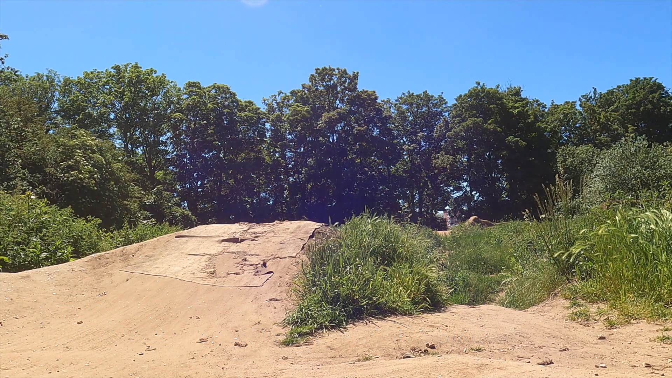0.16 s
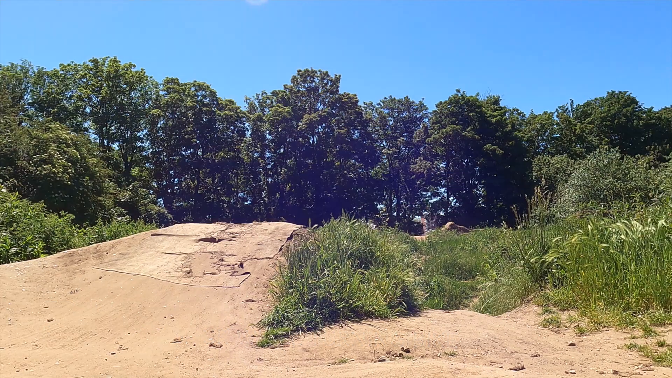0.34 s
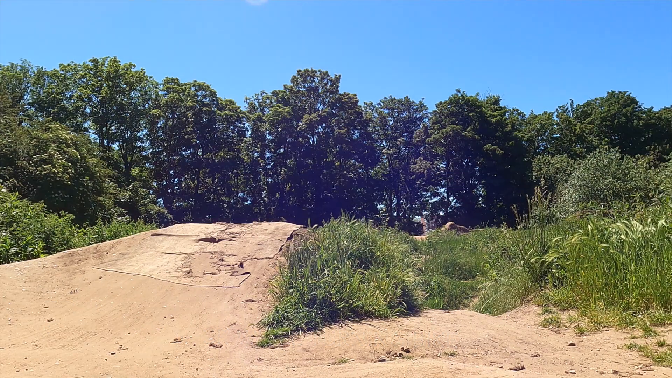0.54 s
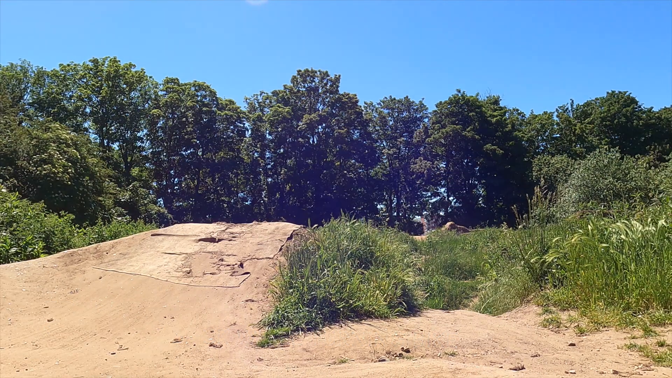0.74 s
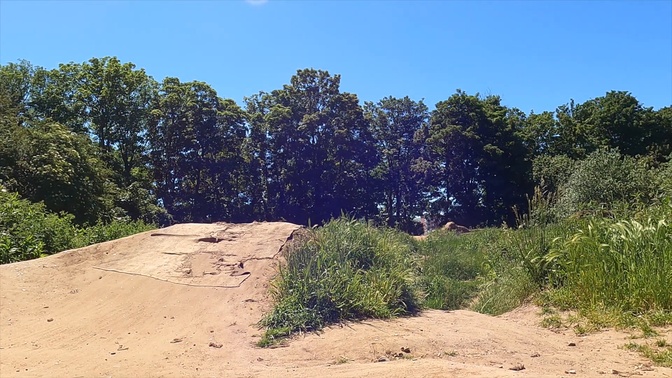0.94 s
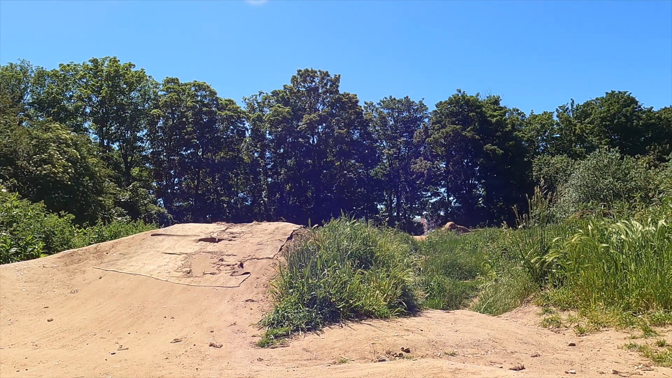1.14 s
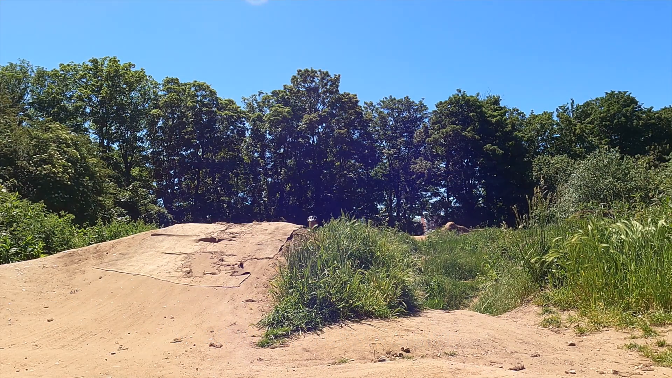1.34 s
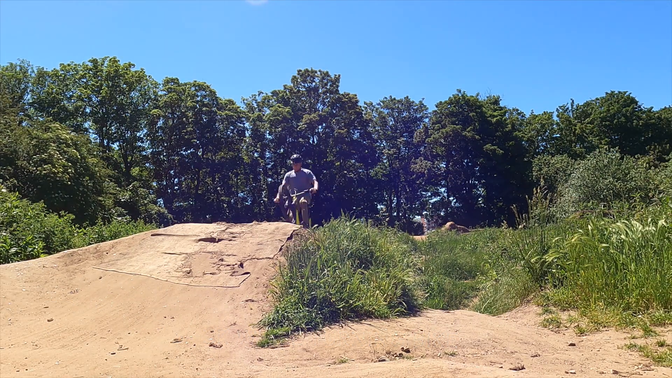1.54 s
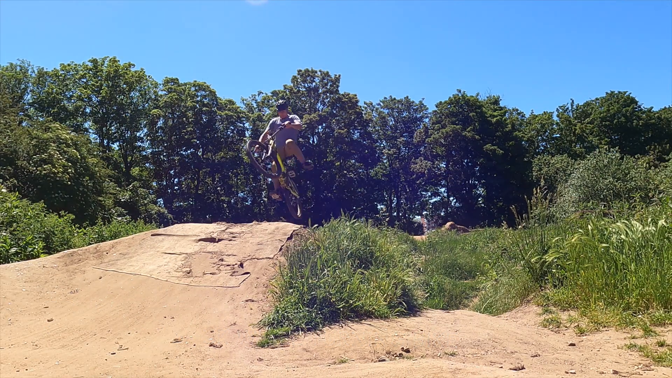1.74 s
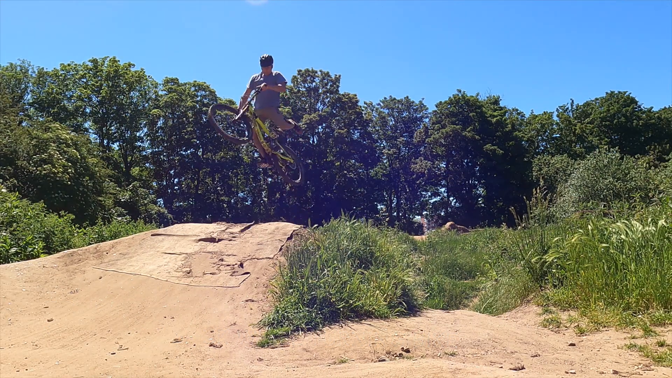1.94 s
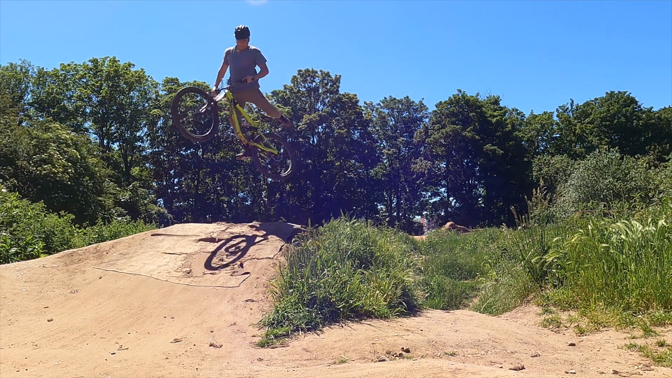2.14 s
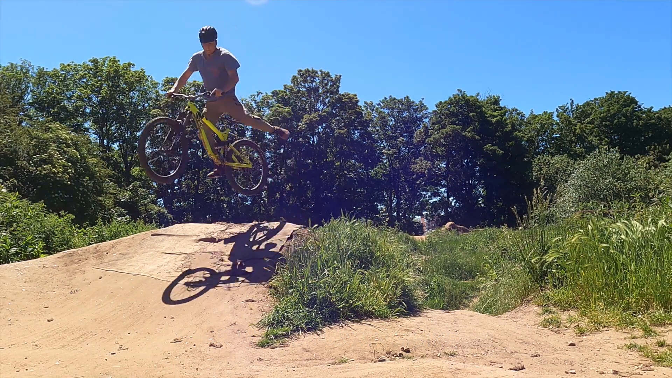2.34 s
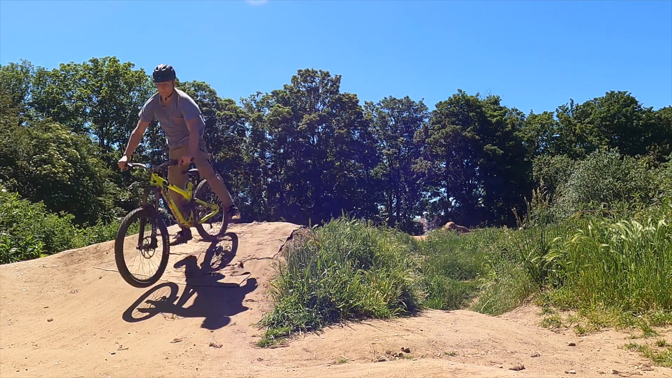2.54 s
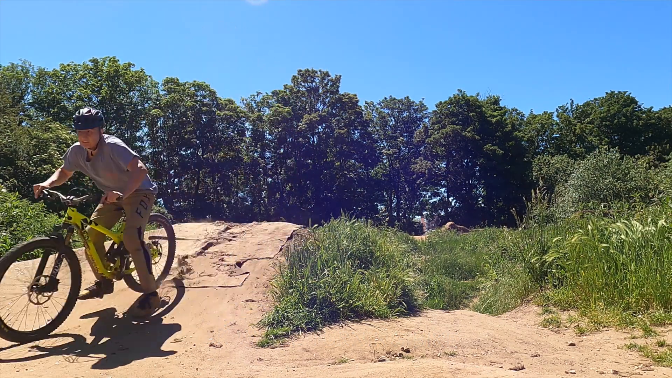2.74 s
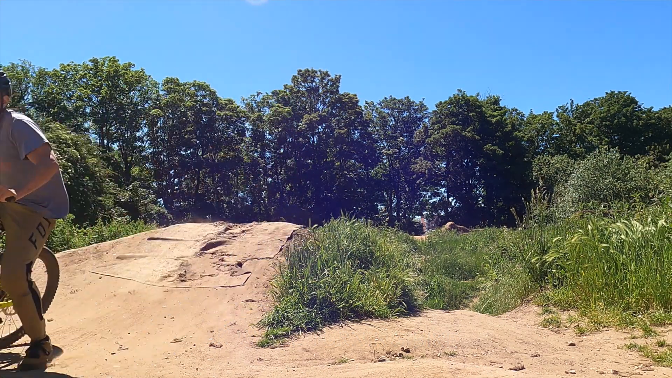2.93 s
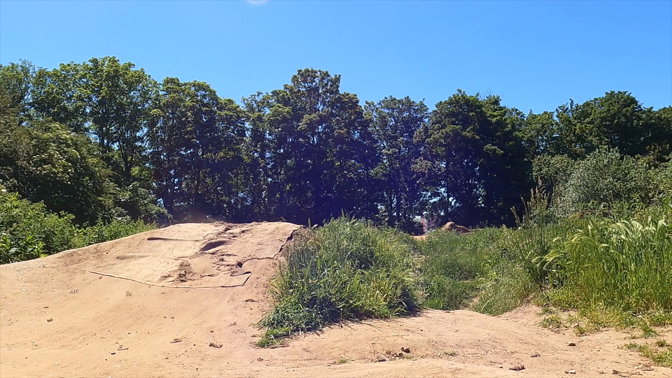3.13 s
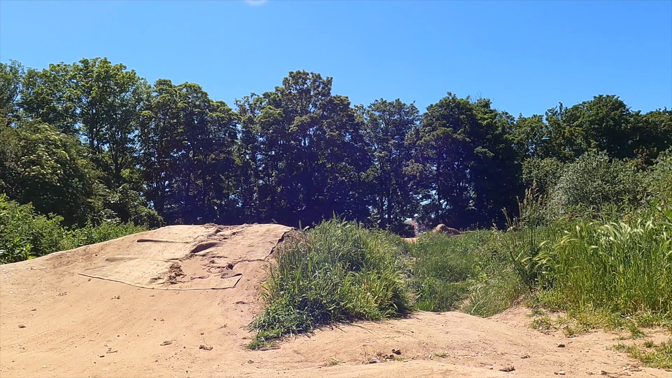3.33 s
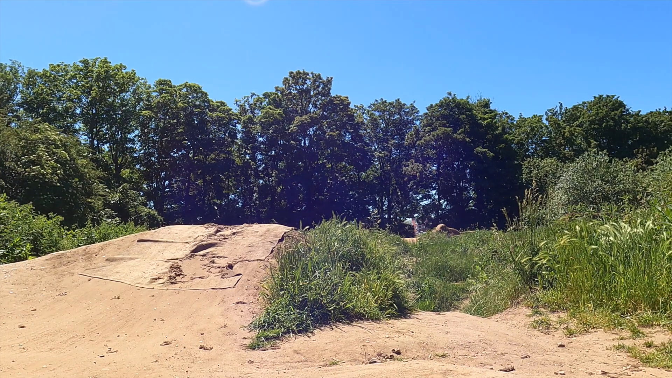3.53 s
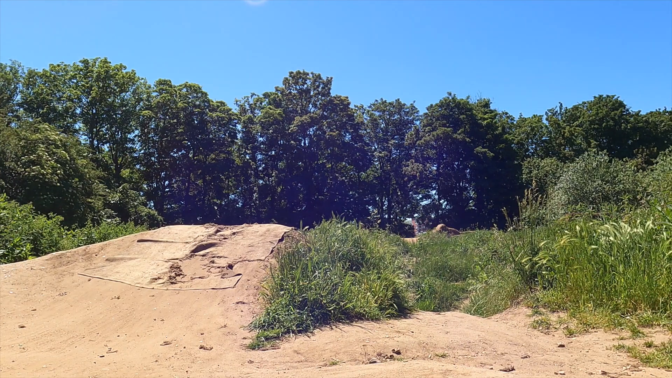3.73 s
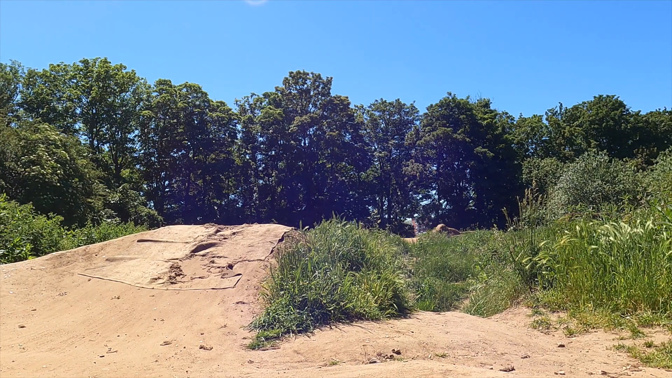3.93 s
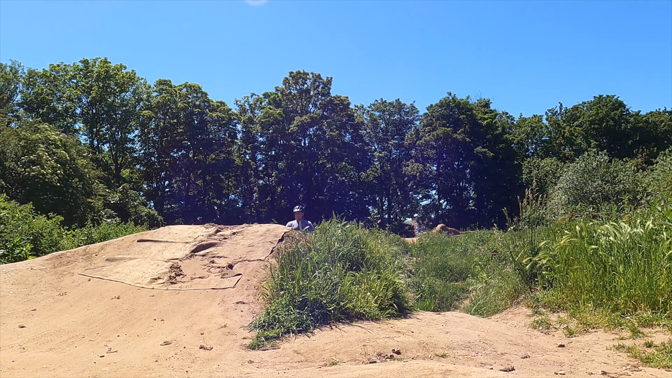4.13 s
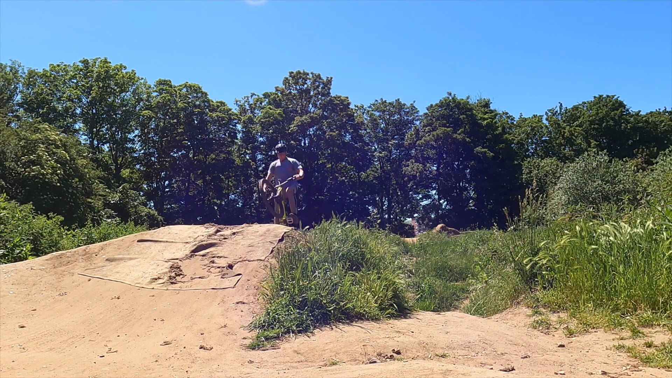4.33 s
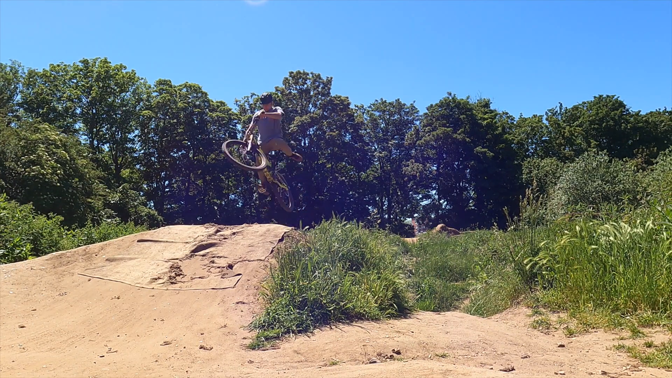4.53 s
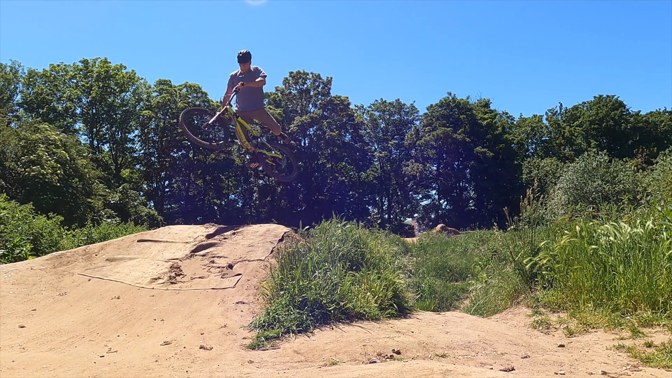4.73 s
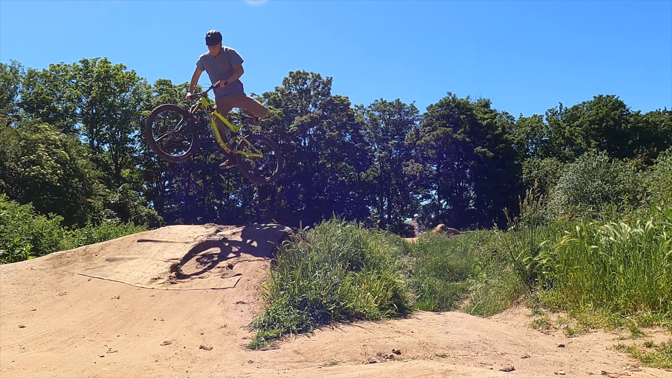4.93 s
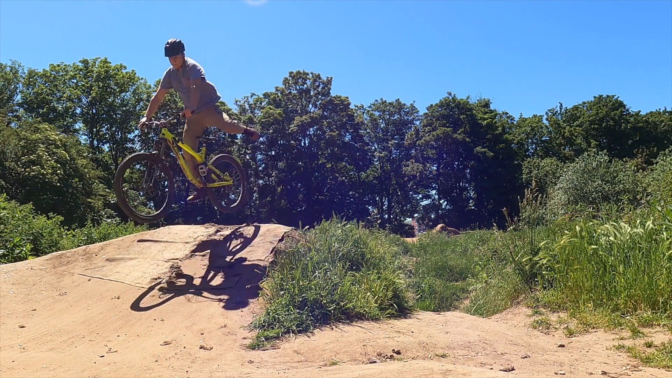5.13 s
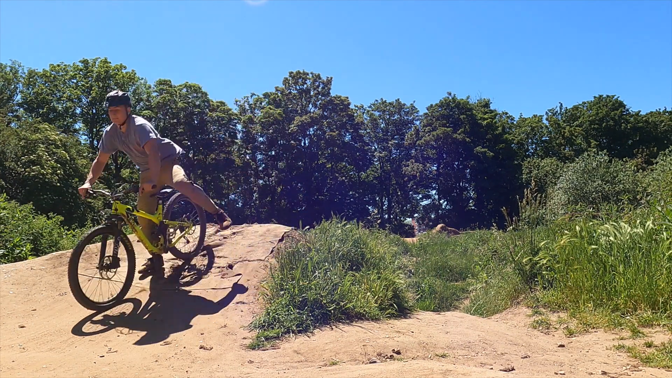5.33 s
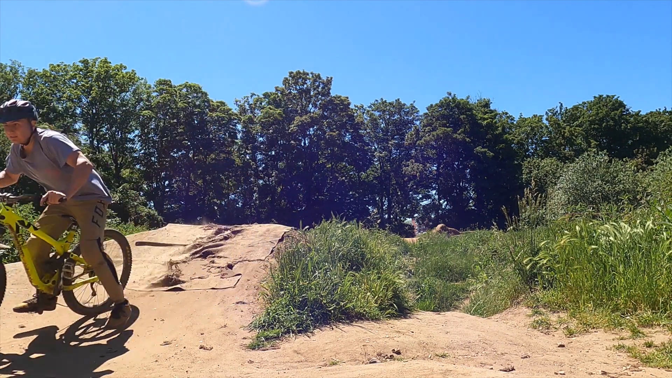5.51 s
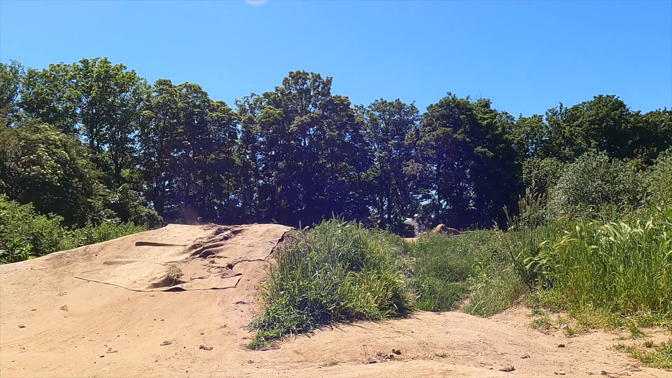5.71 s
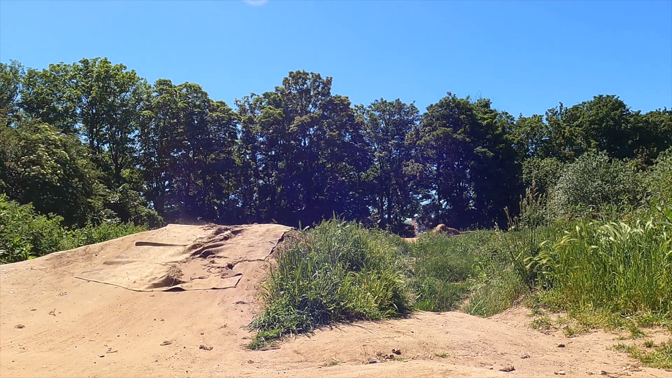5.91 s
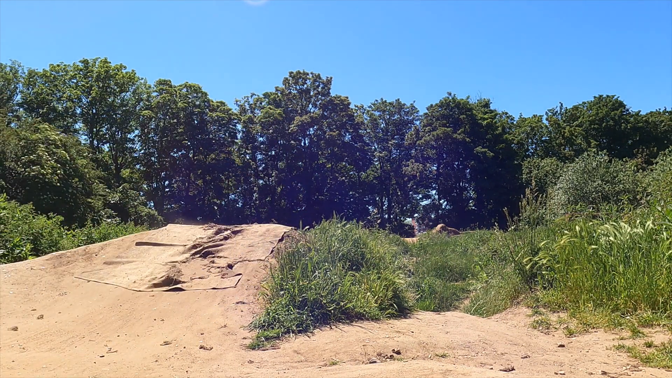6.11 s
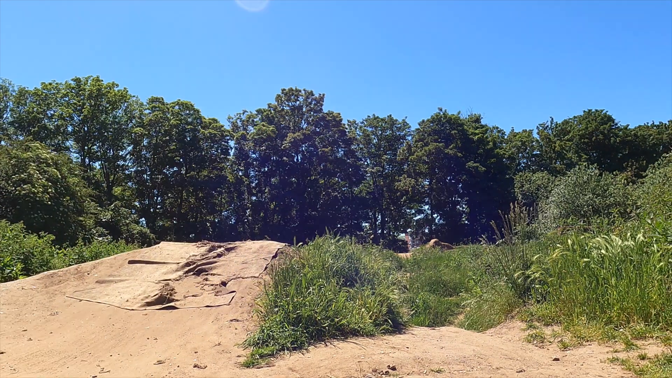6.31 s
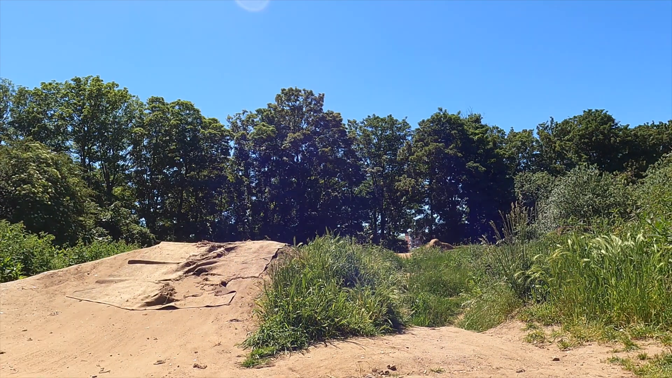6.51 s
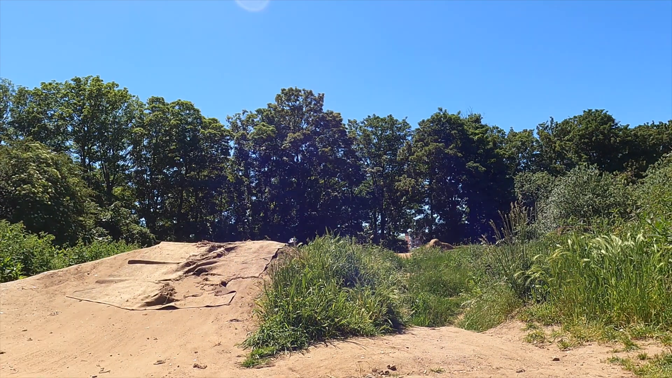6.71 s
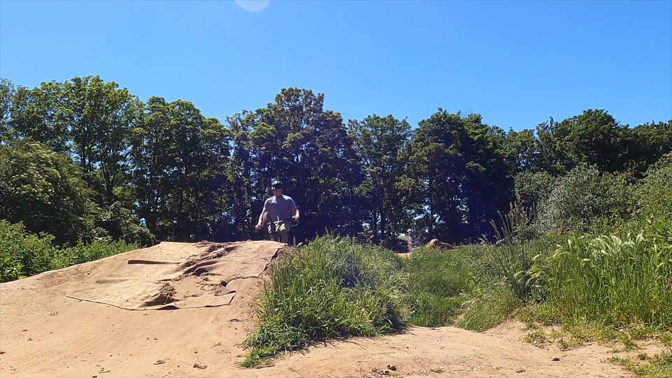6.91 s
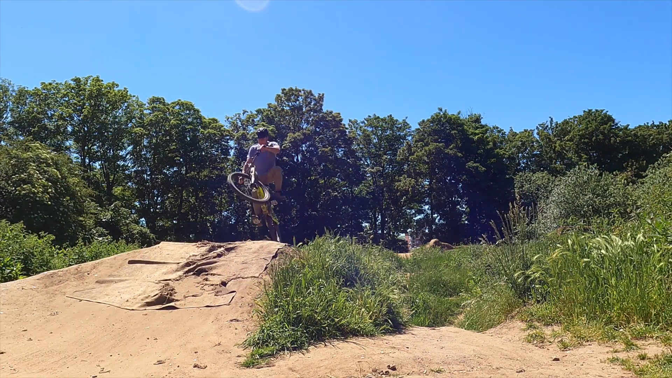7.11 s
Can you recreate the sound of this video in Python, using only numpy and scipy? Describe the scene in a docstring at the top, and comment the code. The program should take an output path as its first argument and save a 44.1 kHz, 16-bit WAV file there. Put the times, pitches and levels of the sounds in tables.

```python
"""A mountain bike sets off close by with quickening freehub ticks, over light wind and leaves that run throughout.
Then come three dirt jumps, joined by abrupt cuts and each on its own clock: tread noise drones up a far ramp,
the wheels squeak off the lip, and the freehub buzzes in flight as pawl clicks ringing a hub, over a faint swish.
In the first two, sine thumps and noise slaps land the wheels; grit, skids, stones and chain rattle past to the left.
The third ends in mid-air."""
import sys
import numpy as np
from scipy import signal
from scipy.fft import rfft, irfft, next_fast_len
from scipy.io import wavfile
from scipy.ndimage import uniform_filter1d, map_coordinates

SR = 44100
rng = np.random.default_rng(int(sys.argv[2]) if len(sys.argv) > 2 else 0)


def wav_record(signal):
    """Record a signal, one row per channel, as 16-bit PCM in the file named by sys.argv[1]."""
    frames = np.transpose(np.atleast_2d(signal))
    bounded = np.clip(frames, -1, 1)
    # unit amplitude maps onto the largest positive 16-bit level
    quanta = np.round(bounded * 32767).astype(np.int16)
    wavfile.write(sys.argv[1], SR, quanta)


N = 315756

# All levels are relative: each layer's spectrum and mix trims are applied on top.
# The jumps: cut_in_s, take_off_s, crunch_db
JUMPS = [(0.279, 1.584, -1), (3.265, 4.311, .5), (6.252, 6.999, 1)]
# Wind buffets on the microphone: start_s, length_s, level_db
GUSTS = [(0, 0.084, -24), (.148, .025, -21), (.2, .068, -25)]
# Low wind rumble, its softer midrange air, and far leaves: pitch_hz, level_db
RUMBLE_SPECTRUM = [(12, -48), (20, -8), (35, -0.5), (53, 4.5), (75, -2), (103, -3), (129, -7), (206, -18.5),
                   (243, -27.5), (280, -12.5), (360, -38), (620, -120)]
AIR_SPECTRUM = [(80, 0), (200, 2), (400, -2), (800, -9), (1500, -30.5), (4000, -61)]
LEAVES_SPECTRUM = [(470, -22.5), (800, -19), (1010, -1), (1170, 0), (1290, -8.5), (1550, -7.5), (1860, -9),
                   (2440, -4.5), (3840, -18.5), (4790, -16.5), (5550, -21.5), (7360, -23.5), (8430, -18),
                   (13900, -39.5), (15000, -61)]
# Single freehub ticks heard close by: pitch_hz, level_db
TICK_SPECTRUM = [(600, -34), (1500, -8), (2500, 4), (3400, -8), (4600, -3), (6000, -5), (8400, 0),
                 (10000, -11), (12500, -20), (15500, -42)]
# Decay of the answer from banks and trees: pitch_hz, t60_s
TREES_DECAY = [(200, 0.29), (2000, 0.57), (10000, .1)]
# Tyre load from touchdown until they have gone by: after_take_off_s, body_db, grit_db
ROLL = [(.995, -35.5, -36), (1.07, -33, -31.5), (1.15, -30.5, -35), (1.21, -36, -35), (1.36, -33.5, -32),
        (1.53, -33.5, -32.5), (1.68, -36.5, -36), (1.95, -41, -41)]
# Short scrapes of the tyres through loose grit: start_s, length_s, level_db
CRUNCHES = [(.14, 0.13, -48), (2.985, 0.082, -34), (5.5, .06, -34), (5.69, .04, -34), (6.03, 0.019, -28),
            (6.075, 0.099, -34)]
# Crushed grit and the boom of the tyre body: pitch_hz, level_db
GRIT_SPECTRUM = [(410, -18.5), (700, 5), (850, -29), (1050, -4), (1450, -3), (2400, 0.5), (2800, 0),
                 (3150, -6.5), (6420, -6.5), (7500, -7), (8880, -6.5), (10600, -17), (12400, -15),
                 (15500, -48)]
TYRE_SPECTRUM = [(53, -34), (90, -2), (130, 2.5), (234, -5.5), (296, 4), (360, -2), (661, -7),
                 (1200, -10.5), (1560, -40.5), (2640, -120)]
# Stones and chain striking the bike: start_s, peak_db, ring_hz, knock_db, contact_s
CLACKS = [(.1475, -33, 2950, 4, .003), (.1825, -35, 3000, 4, .003), (.2368, -11, 3490, -4, 0.0033),
          (.244, -27, 2150, -4, .004), (.3775, -25, 2630, 0.5, 0.0064), (.483, -42, 7000, -8, 0.0071),
          (.5445, -33.5, 2270, 8, .003), (.624, -34, 2750, -4, .002), (.6388, -27, 2580, -7, 0.0054),
          (.806, -45, 2600, 7, 0.0017), (1.372, -42, 2300, 2, 0.012), (1.4215, -38.5, 2600, 5, 0.0082),
          (1.535, -42, 3800, -4, .02), (1.5856, -31, 1950, 3, .006), (1.77, -34, 2200, 7.5, 0.0055),
          (2.6017, -16, 2630, 5, 0.0067), (2.632, -14, 3470, 7, 0.0023), (2.6471, -8, 4900, -3, 0.0077),
          (2.6667, -4.5, 7120, -23, .003), (2.6864, -17, 5440, -11, .003), (2.696, -24, 7560, -12, .002),
          (2.718, -14.5, 6000, -10, .002), (2.7555, -16.5, 6840, -15, 0.0018),
          (2.799, -16.5, 6070, -15, .002), (2.811, -11, 6070, -18, 0.0037),
          (2.8619, -13, 6230, -21, 0.0018), (2.8948, -14, 6600, -15, .001), (2.914, -15.5, 4260, -20, .003),
          (3.0215, -10, 4130, -8, 0.0044), (3.0326, -11.5, 4400, -2.5, .004), (3.0589, -25, 1760, -2, .003),
          (3.0774, -19, 2440, 4, .003), (3.0944, -10, 4230, -15, 0.0074), (3.1054, -25, 4006, 4, 0.0026),
          (3.2136, -8, 5660, -28.5, .003), (3.306, -34, 2600, 6, 0.0017), (4.172, -45, 3330, -5, .01),
          (4.288, -42, 3770, -4, 0.025), (4.3314, -35.5, 3670, 2, .005), (4.405, -39, 2040, 8.5, 0.016),
          (4.8399, -21, 5480, -7, 0.0025), (4.888, -21.5, 5500, -8, .002), (5.222, -27.5, 2000, 2, 0.0046),
          (5.321, -17, 4450, -18, 0.0081), (5.353, -16, 3500, 3, 0.0011), (5.369, -3, 4230, -13, 0.0015),
          (5.374, -11, 5070, -12, .002), (5.3785, -7, 7200, -18, 0.0016), (5.4047, -9.5, 4540, -13, 0.0026),
          (5.411, -13, 6010, -10, 0.0049), (5.4284, -11, 4270, -3, 0.0021), (5.4515, -10, 5910, -3, 0.0009),
          (5.4834, -16.5, 5000, -2, .003), (5.494, -14.5, 4280, -10, .004), (5.5054, -16, 6500, -8, .002),
          (5.5787, -13.5, 6750, -8, 0.0039), (5.6895, -15, 7880, -13, .002),
          (5.7224, -18, 2050, -4, 0.0025), (5.7584, -15, 5500, -5, .002), (5.8047, -21, 6000, 2, 0.0043),
          (5.8272, -12, 4980, -6, 0.00097), (5.8444, -14.5, 6030, -12, 0.0021), (5.897, -12, 4290, 6, .002),
          (5.9295, -10, 4280, 3, 0.0071), (5.97, -15.5, 6000, 1, 0.0027),
          (6.0157, -22.5, 7400, -12, 0.0012), (6.032, -15, 2074, 4, 0.0065),
          (6.2379, -25, 4130, 11.5, 0.0045), (6.845, -45, 3350, 4, .008), (6.966, -45, 3780, 11, .004),
          (7.0113, -36, 3770, 5, .005)]
# Crack, its treble sparkle, and the duller knock: pitch_hz, level_db
CLACK_SPECTRUM = [(200, -42), (1300, -6), (2200, 4), (3300, 3.5), (4500, 7), (6000, -2.5), (7500, -16),
                  (12000, -33), (15500, -55.5)]
SPARKLE_SPECTRUM = [(3000, -32), (5500, -4), (7300, -3.5), (8500, -8.5), (10000, -13), (12000, -26),
                    (15500, -31)]
KNOCK_SPECTRUM = [(150, 2), (600, 4), (1100, 8.5), (2000, 3), (4000, -45)]
# Tyres pressed into the far dip and the ramp: after_take_off_s, drone_db, loose_grit_db
RUN_UP = [(-1.29, -79, -61.5), (-1.073, -42.5, -53), (-0.977, -34.5, -54), (-0.75, -35.5, -60),
          (-0.8, -42.5, -62), (-.35, -40, -68), (-0.081, -33.5, -61), (-0.013, -45, -54.5),
          (.12, -55, -54.5), (.4, -72, -57)]
# Resonances of the hollow ramp deck: pitch_hz, width_hz, level_db
DECK_MODES = [(295, 18.8, -3), (468, 63, -10), (676, 41, -22.5)]
# Ramp roar, far loose grit, and the growl in the dip: pitch_hz, level_db
RAMP_SPECTRUM = [(120, -30), (200, -16), (237, -25.5), (270, -3.5), (296, 2), (357, -16.5), (506, -5),
                 (700, -16.5), (986, -35.5), (1170, -52), (1400, -35), (1820, -73), (3080, -120)]
FAR_GRIT_SPECTRUM = [(500, -19), (1200, 1), (1800, -1), (2500, 5), (3400, -10), (4500, -11), (8500, -11.5),
                     (11000, -22.5), (15000, -37)]
BITE_SPECTRUM = [(350, -16), (600, 3.5), (900, -2.5), (1200, 0.5), (1700, -40), (3000, -48)]
# Wheels knocking over joints in the ramp: start_s, peak_db
BUMPS = [(0.447, -35), (0.548, -28.5), (1.536, -29), (4.294, -30), (6.965, -28)]
# Squeaks at the lip: start_s, length_s, level_db, first_hz, last_hz
SQUEAKS = [(1.584, .04, -52.5, 7200, 7450), (4.325, .035, -51.5, 7000, 7300),
           (7.005, .035, -52, 7170, 7500)]
# Broad colour of the hub: pitch_hz, level_db
HUB_SPECTRUM = [(470, -58), (800, -31.5), (894, -32.5), (1100, -18.5), (1600, -0.5), (1840, -10),
                (2380, -9.5), (2870, -5.5), (3330, -7.5), (3960, -9.5), (4770, -9), (8340, -0.5),
                (9320, -6.5), (12200, -13.5), (15500, -25)]
# Resonances of hub shell, pawls, and those standing out near touchdown: pitch_hz, width_hz, level_db
SHELL_MODES = [(2412, 62, -0.5), (2794, 52, 5), (3930, 160, -11), (5000, 140, -14.5), (8620, 73, 4),
               (9290, 190, -2)]
PAWL_MODES = [(2340, 380, 4), (4780, 258, -2)]
SING_MODES = [(2380, 76, -5), (2850, 60, -3), (8580, 120, -1.5)]
# Wheels and shoes hitting the ground: start_s, thump_db, tyre_hz, slap_db
LANDINGS = [(2.582, -18, 54.4, -17.5), (2.632, -23, 66.6, -9.5), (2.644, -12, 71, -25),
            (2.734, -33, 110, -15.5), (5.3, -29, 50, -25), (5.353, -17, 75.4, -8.5),
            (5.366, -18, 74.5, -14.5), (5.459, -36, 109.9, -10.5)]
# Slap of a landing: pitch_hz, level_db
SLAP_SPECTRUM = [(60, -12), (250, 0.5), (550, -1.5), (1000, -2.5), (2000, -13), (3500, -14), (6000, -30),
                 (15000, -53.5)]
# Slides on the dirt: start_s, length_s, level_db, first_rasp_hz, last_rasp_hz, broad_scuff_db
SKIDS = [(2.695, 0.044, -35, 1206, 1102, -4), (2.953, 0.014, -23, 1138, 1104, -3.5),
         (2.97, 0.061, -27, 1195, 1600, -1), (3.04, 0.064, -30.5, 1251, 1315, -0.5),
         (5.431, .014, -23, 946, 850, -5), (5.452, .02, -32.5, 845, 855, 2),
         (5.6, 0.0298, -39, 1491, 1299, 4.5), (5.742, 0.043, -23, 957, 1167, -2),
         (5.79, 0.018, -26.5, 1150, 1294, -1), (6.122, 0.0664, -34, 2450, 2250, -12)]
# Broad scuff of rubber on dirt: pitch_hz, level_db
SCUFF_SPECTRUM = [(120, -14), (200, -7.5), (425, -3.5), (628, 4.5), (812, -9), (980, 5), (1270, -5.5),
                  (2380, -6.5), (2730, -35.5), (4250, -13), (5000, -10), (6500, -42), (11000, -120)]
# Tread hum and low throb going by: start_s, length_s, level_db, first_hz, last_hz
HUMS = [(2.717, 0.089, -31, 313, 299), (5.741, 0.18, -33, 212, 167.4), (5.964, 0.34, -28.5, 49, 72.8)]
# Shading of the far side of the microphone: pitch_hz, share_of_pan (ratio)
SHADOW = [(700, 1.2), (1300, 0.78), (2400, 1.36), (4400, 0.85), (9000, 0.98), (13000, 1)]
# Left-right phase difference by pitch: pitch_hz, half_phase_difference_rad
SIDE_PHASE = [(600, 0.061), (1200, 0.17), (2200, 0.13), (4000, 0), (9000, 0), (12000, 0.4)]

# Opening: pawl ticks a second (Hz) from slow to fast, and the time constant of the speed-up
SETTING_OFF_DB, FIRST_TICK_S, SLOW_HZ, FAST_HZ, SPEED_UP_S = -49, 0.0038, 48.4, 106.3, .15
# Steady rumble, plus the draught of the passing bike
WIND_DB, DRAUGHT_DB, DRAUGHT_S, DRAUGHT_WIDTH_S = -39, 4, 1.37, 0.56
# Cracks die in this t60; smaller stones ring higher and sparkle more
CLACK_T60_S, SPARKLE_DB, SPARKLE_DB_PER_OCTAVE, SPARKLE_HZ = .017, -2.5, 6.5, 4000
# Lesser stones thrown up while rolling; pitch is the middle of their range
STRAY_PER_S, STRAY_OVER_GRIT_DB, STRAY_HZ, STRAY_KNOCK_DB, STRAY_S = 24, 8.5, 5630, -14, .0008
# The tread growls higher while pressed into the bottom of the dip
BITE_DB, BITE_S, BITE_WIDTH_S = -51, -0.908, .11
# Hub and pawl ring before facing changes, and their rise and fall around the loudest moment
HUB_DB, PAWL_DB, NEARING_DB_PER_S, LOUDEST_S = -40, -41.2, 7.5, 0.98
# A short extra burst of pawl ring just after take-off
BURST_DB, BURST_S, BURST_WIDTH_S = -47.5, 0.19, 0.067
# The hub rises clear of the lip
CLEAR_S, CLEAR_WIDTH_S = 0.16, 0.042
# The rear wheel swings edge-on and hides the hub, then a shallower dip as it swings back
TURN_S, TURN_WIDTH_S, HUB_TURN_DB, PAWL_TURN_DB = 0.43, 0.1, -12, -15
STRAIGHTEN_S, STRAIGHTEN_WIDTH_S, STRAIGHTEN_DB = 0.778, .1, -2.5
# Some resonances stand out before touchdown; the buzz turns duller once the wheels are down
SING_DB, SING_S, SING_WIDTH_S = -47, 1, 0.091
LANDED_S, HUB_LANDED_DB, PAWL_LANDED_DB = 1.01, -6, 1
# Clicks a second at take-off, time constant of their slowing, rate at which they merge
RATCHET_HZ, SPIN_DOWN_S, BLUR_HZ = 218.8, 2.3, 240
# Ground reflection: lag at take-off, seconds of lag per second, strength before its own tone, end
LAG_S, LAG_GROWTH, REFLECTION, REFLECTION_END_S = 0.000418, 0.00026, 0.46, 0.47
# The bike's own parts reflect the buzz: mean lag, share it wanders, knots a second, strength
GLINT_LAG_S, GLINT_SWING, GLINT_RATE, GLINT = .0008, .14, 9, .18
# Air in the wheels around the top of the jump
SWISH_DB, SWISH_S, SWISH_WIDTH_S = -51, 0.49, 0.3
# Its lowest pitch, its extra height before and after, its width, the wider hiss around it
SWISH_HZ, SWISH_BEND_HZ, SWISH_BAND_HZ, SWISH_BROAD_DB = 1080, 549, 270, -2.5
# The bike goes behind the microphone this long after take-off
PASS_S, PASS_WIDTH_S = 1.68, 0.12
# Left minus right before shading: in flight, added after touchdown, added behind
PAN_AHEAD_DB, PAN_NEAR_DB, PAN_BEHIND_DB = 0, 2.5, 8
TOP_HZ = 15400  # nothing sounds above this


def amp(db):
    """Decibels to gain."""
    return 10 ** (np.asarray(db) / 20)


def unit(x):
    """Scale to rms 1."""
    return x / np.sqrt(np.mean(x ** 2) + 1e-20)


def along(points, hz):
    """Read (Hz, value) points on a log frequency axis."""
    f, v = np.transpose(points)
    return np.interp(np.log(hz + 1), np.log(f + 1), v)


def wobble(rate):
    """A smooth random curve, rate knots a second."""
    knots = rng.standard_normal(int(N * rate / SR) + 4)
    return map_coordinates(knots, [np.arange(N) * rate / SR])


def filtered(x, response):
    """Multiply the spectrum of x by a response of frequency."""
    n = x.shape[-1]
    m = 2 * next_fast_len(n // 2 + 4096)
    return irfft(rfft(x, m) * response(np.fft.rfftfreq(m, 1 / SR)), m)[..., :n]


def coloured(x, spectrum):
    """Shape x with a causal filter of this spectrum, at rms 1."""
    def response(hz):
        # folding the cepstrum gives minimum phase, so attacks stay sharp
        cepstrum = irfft(np.log(amp(along(spectrum, hz)) + 1e-6))
        half = len(cepstrum) // 2
        return np.exp(rfft(np.r_[cepstrum[0], 2 * cepstrum[1:half], np.zeros(half)]))
    return unit(filtered(x, response))


def resonant(x, modes):
    """Ring x through parallel resonances of alternating sign, at rms 1."""
    def response(f):
        total = 0
        for k, (centre, width, db) in enumerate(modes):
            band = 1j * f * width / (centre * centre - f * f + 1j * f * width)
            total = total + (-1) ** k * amp(db) * band
        return total
    return unit(filtered(x, response))


def noise():
    """Fresh white noise."""
    return rng.standard_normal(N)


def grains(rate, spread_db, smooth):
    """Random tiny fractures of uneven size, over a bed of finer ones."""
    sizes = amp(spread_db * np.clip(noise(), -2, 2)) * np.sign(noise())
    fractures = unit(sizes * (rng.random(N) < rate / SR))
    return unit(fractures + smooth * noise())


def patchy(x, depth_db):
    """Vary the colour of x at random over time and pitch, at rms 1."""
    z = signal.stft(x, nperseg=1024)[2]
    across_pitch = uniform_filter1d(rng.standard_normal(z.shape), size=5, axis=0)
    field = uniform_filter1d(across_pitch, size=6, axis=1)
    return unit(signal.istft(z * amp(depth_db * unit(field)), nperseg=1024)[1][:N])


def whistle(hz, width_hz):
    """A narrow band of noise at rms 1 whose centre follows hz."""
    flutter = filtered(rng.standard_normal((2, N)), lambda f: 1 / (1 + (2 * f / width_hz) ** 2))
    phase = 2 * np.pi * np.cumsum(hz) / SR
    return unit(flutter[0] * np.cos(phase) + flutter[1] * np.sin(phase))


def delayed(x, lag_s):
    """Hear x a varying time later."""
    return map_coordinates(x, [np.arange(N) - lag_s * SR], order=3)


def add(track, s, sound):
    """Mix a sound in at time s."""
    part = track[round(s * SR):][:len(sound)]
    part += sound[:len(part)]


def swells(rows, attack, release_t60):
    """Gain of (start_s, length_s, level_db) events: attack, hold, release; the strongest wins."""
    t = np.arange(N) / SR
    gains = []
    for s, length, db in rows:
        release_db = -60 * np.maximum(t - s - length, 0) / release_t60
        gains.append(np.clip((t - s) / attack, 0, 1) * amp(db + release_db))
    return np.max(gains, axis=0)


def per_jump(column):
    """One column of JUMPS, held until the next cut."""
    jumps = np.array(JUMPS)
    return jumps[np.searchsorted(jumps[1:, 0], np.arange(N) / SR), column]


def jump_clock():
    """Seconds since take-off in the current jump, per sample; negative on the approach."""
    return np.arange(N) / SR - per_jump(column=1)


def over_jump(rows, column):
    """Gain from a dB column on the jump clock, silent outside the table's span."""
    rows = np.array(rows)
    db = np.interp(jump_clock(), rows[:, 0], rows[:, column], left=-np.inf, right=-np.inf)
    return uniform_filter1d(amp(db), size=500)


def after(s, width):
    """A soft step from 0 to 1, s seconds after each take-off."""
    return uniform_filter1d((1 + np.tanh((jump_clock() - s) / (2 * width))) / 2, size=500)


def around(s, width):
    """A bell that reaches 1, s seconds after each take-off."""
    return np.exp(-((jump_clock() - s) / width) ** 2)


def breeze(apart=0.023):
    """Wind rumbles and buffets at the microphone and stirs far leaves, partly different on each side."""
    def wide(spectrum, side):
        return coloured(noise(), spectrum) + side * np.array([[1], [-1]]) * coloured(noise(), spectrum)
    rumble_db = WIND_DB + DRAUGHT_DB * around(DRAUGHT_S, DRAUGHT_WIDTH_S) + 0.68 * wobble(4.9)
    rumble = amp(rumble_db) * wide(RUMBLE_SPECTRUM, apart)
    buffet_spectrum = [(15, -9.5), (35, 1.5), (60, -6.5), (150, -21.0), (400, -57), (1500, -54.5)]
    buffets = swells(GUSTS, attack=.01, release_t60=0.086) * wide(buffet_spectrum, side=0.83)
    leaves = amp(-58.0 + 1.77 * wobble(3.04)) * wide(LEAVES_SPECTRUM, side=0.37)
    return rumble + buffets + leaves + amp(-49) * wide(AIR_SPECTRUM, side=0.25)


def setting_off(tick_t60=.03):
    """Close by, the pawls tick one by one, faster as the bike gathers speed, until the first cut."""
    t = np.arange(N) / SR
    rate = FAST_HZ + (SLOW_HZ - FAST_HZ) * np.exp(-t / SPEED_UP_S)
    teeth = np.ceil(np.cumsum(rate * (t > FIRST_TICK_S)) / SR)
    ticks = np.diff(teeth, prepend=0) * amp(noise()) / np.sqrt(rate)
    clicks = signal.fftconvolve(ticks, amp(-60 * t[:SR // 20] / tick_t60))[:N]
    return amp(SETTING_OFF_DB) * coloured(clicks * noise(), TICK_SPECTRUM) * (t < JUMPS[0][0])


def surroundings(x):
    """Banks and trees scatter a thin decaying answer, different in each ear, which stops just after each cut."""
    hz, t, z = signal.stft(rng.standard_normal((2, SR // 3)), SR, nperseg=256)
    decay = amp(-60 * t / along(TREES_DECAY, hz)[:, None])
    tail = signal.istft(z * decay, SR, nperseg=256)[1]
    tail = tail / np.linalg.norm(tail[0])
    parts = np.split(x, [round((cut + .01) * SR) for cut, *_ in JUMPS])
    return np.hstack([signal.fftconvolve(part[None], tail, axes=1)[:, :len(part)] for part in parts])


def rolling():
    """Tyres boom on the packed dirt and crush its grit; single pebbles snap above the finer crunch."""
    clumps = amp(1.4 * wobble(45) + 1.2 * wobble(260))
    sand = grains(rate=3500, spread_db=2.7, smooth=.6)
    grit = coloured(patchy(clumps * sand, depth_db=3.0), GRIT_SPECTRUM)
    body = coloured(clumps * grains(rate=600, spread_db=3, smooth=0.7), TYRE_SPECTRUM)
    near = amp(-.5) * grit + amp(-7.5) * pebbles()
    # behind the microphone the treble is shaded and the scrape turns hollow
    behind = after(PASS_S, PASS_WIDTH_S)
    shade = [(1000, -2.5), (2300, -1.5), (4800, 3.0), (8000, -4.0), (11000, -13)]
    shaded = filtered(near, lambda hz: amp(along(shade, hz)))
    passing = over_jump(ROLL, column=2) * amp(per_jump(column=2))
    crunch = np.hypot(passing, swells(CRUNCHES, attack=.015, release_t60=0.1))
    return crunch * ((1 - behind) * near + behind * shaded) + over_jump(ROLL, column=1) * body


def pebbles(per_second=650, centre_hz=3500, spread=.6, cycles=3, size_db=3.4):
    """Small stones snap from under the tread, each ringing for a few cycles at its own pitch."""
    draws = rng.random((round(per_second * N / SR), 3))
    hz = np.clip(centre_hz * np.exp(spread * np.sqrt(12) * (draws[:, 1:2] - .5)), 500, 12000)
    size = amp(size_db * np.minimum(-np.log(1 - draws[:, 2:]), 4))
    lag = np.arange(SR // 200)
    snaps = size * np.sin(2 * np.pi * hz * lag / SR) * np.exp(-hz * lag / SR / cycles)
    starts = (draws[:, :1] * N).astype(int)
    return unit(np.bincount((starts + lag).ravel(), snaps.ravel(), N)[:N])


def clacks(ring_t60=.031, ring_db=-2.5, knock_t60=.027, rise=.0005, scatter=.21):
    """Hard contacts crack while the parts chatter, then stop short, with a metal ring and a duller knock."""
    out, t = np.zeros(N), np.arange(SR // 16) / SR

    def envelope(life, length):
        return amp(-60 * np.maximum(t - length, 0) / life) * (1 - np.exp(-t / rise))

    def burst(life, length):
        return rng.standard_normal(len(t)) * envelope(life, length)

    for s, db, hz, knock_db, length in list(CLACKS) + stray_stones():
        # the main pitch and four random neighbours
        partials = hz * np.exp(scatter * np.clip(rng.standard_normal((4, 1)), -2, 1))
        tones = 2 * np.sin(2 * np.pi * hz * t) + np.sin(2 * np.pi * partials * t).sum(0)
        ring = unit(tones * envelope(ring_t60, length))
        sparkle_db = SPARKLE_DB + SPARKLE_DB_PER_OCTAVE * np.log2(hz / SPARKLE_HZ)
        crack = coloured(burst(CLACK_T60_S, length), CLACK_SPECTRUM)
        sparkle = amp(sparkle_db) * coloured(burst(CLACK_T60_S, length), SPARKLE_SPECTRUM)
        knock = amp(knock_db - 0.5) * coloured(burst(knock_t60, length), KNOCK_SPECTRUM)
        level = amp(db - 14.5) * np.std(envelope(CLACK_T60_S, length))
        add(out, s, level * (crack + sparkle + amp(ring_db) * ring + knock))
    return out


def stray_stones(spread_db=2.2, spread_octaves=.4):
    """Rows for random lesser clacks, whose strength follows the grit under the tyres at that moment."""
    count = round(STRAY_PER_S * N / SR)
    grit = over_jump(ROLL, column=2)
    draws = rng.random((count, 3))
    places = ((np.arange(count) + draws[:, 0]) * N / count).astype(int)
    rows = []
    for i, (size, pitch) in zip(places, 2 * draws[:, 1:] - 1):
        if grit[i] > 1e-3:
            db = 20 * np.log10(grit[i]) + STRAY_OVER_GRIT_DB + spread_db * size
            rows.append((i / SR, db, STRAY_HZ * 2 ** (spread_octaves * pitch), STRAY_KNOCK_DB, STRAY_S))
    return rows


def ramp():
    """Tread knobs drum on the hollow take-off ramp and stir its grit."""
    deck = resonant(grains(rate=1200, spread_db=1.5, smooth=0.68), DECK_MODES)
    deck = coloured(deck, [(100, -28), (260, -2.5), (600, -2.5), (1000, -15.5), (3000, -46)])
    roar = coloured(grains(rate=1100, spread_db=2, smooth=0.85), RAMP_SPECTRUM)
    far_grit = amp(2.05 * wobble(70)) * grains(rate=1300, spread_db=4.0, smooth=1.0)
    rustle = coloured(far_grit, FAR_GRIT_SPECTRUM)
    drone = amp(1.1 * wobble(16)) * (amp(-2.5) * deck + amp(-6.0 + wobble(18)) * roar)
    bite_gain = amp(BITE_DB + 2 * wobble(24.83)) * around(BITE_S, BITE_WIDTH_S)
    bite = bite_gain * coloured(noise(), BITE_SPECTRUM)
    loose = amp(3.5) * over_jump(RUN_UP, column=2) * rustle
    return over_jump(RUN_UP, column=1) * drone + bite + loose + bumps()


def bumps(t60=0.04):
    """Wheels crossing joints give short hollow knocks: decaying noise in the ramp's colour."""
    out, t = np.zeros(N), np.arange(SR // 8) / SR
    for s, db in BUMPS:
        knock = coloured(rng.standard_normal(len(t)) * amp(-60 * t / t60), RAMP_SPECTRUM)
        add(out, s, amp(db) * knock / np.abs(knock).max())
    return out


def squeaks(width_hz=500):
    """Thin rising squeaks, narrow gliding noise, from the bike as its wheels leave the lip."""
    out = np.zeros(N)
    for s, length, db, first_hz, last_hz in SQUEAKS:
        progress = np.clip((np.arange(N) / SR - s) / length, 0, 1)
        hz = first_hz + (last_hz - first_hz) * progress
        out += swells([(s, length / 2, db)], attack=.004, release_t60=0.09) * whistle(hz, width_hz)
    return out


def freehub(jitter=.04, click_t60=0.024):
    """Pawls tick over the ratchet and ring the hub; a ground reflection sweeps a comb through the buzz."""
    aloft = np.maximum(jump_clock(), 0)
    rate = RATCHET_HZ * np.exp(-aloft / SPIN_DOWN_S)
    teeth = np.cumsum(rate * (1 + jitter * wobble(7))) / SR
    ticks = np.diff(np.floor(teeth), prepend=0) * amp(2.7 * noise())
    clicks = signal.fftconvolve(ticks, amp(-60 * np.arange(SR // 30) / SR / click_t60))[:N]
    # fast clicks merge into steady hiss
    hiss = np.clip(rate / BLUR_HZ, 0, 1)
    power = clicks ** 2 / (np.abs(uniform_filter1d(clicks ** 2, size=4096)) + 1e-9)
    rasp_gain = np.sqrt((1 - hiss) * power + hiss)

    def rasp():
        return patchy(rasp_gain * noise(), depth_db=2.5)

    shell = amp(1.25) * coloured(rasp(), HUB_SPECTRUM) + amp(-1.5) * resonant(rasp(), SHELL_MODES)
    ring = amp(-5.5) * resonant(rasp(), PAWL_MODES)
    buzz = hub_gain(HUB_DB, HUB_TURN_DB, HUB_LANDED_DB) * shell
    buzz = buzz + hub_gain(PAWL_DB, PAWL_TURN_DB, PAWL_LANDED_DB) * ring
    buzz = buzz + amp(BURST_DB) * around(BURST_S, BURST_WIDTH_S) * resonant(rasp(), PAWL_MODES)
    buzz = buzz + amp(SING_DB) * around(SING_S, SING_WIDTH_S) * resonant(rasp(), SING_MODES)
    glint = delayed(buzz, GLINT_LAG_S * (1 + GLINT_SWING * wobble(GLINT_RATE)))
    buzz = (buzz + GLINT * glint) / np.hypot(1, GLINT)
    late = delayed(buzz, LAG_S + LAG_GROWTH * aloft)
    # grass swallows the top of the reflection
    late = filtered(late, lambda hz: amp(along([(5000, 3.5), (8500, -4.0), (11000, -24)], hz)))
    return buzz + REFLECTION * (1 - after(REFLECTION_END_S, 0.054)) * late


def hub_gain(near_db, turn_db, landed_db):
    """The hub clears the lip, grows as it nears, dips as the wheel turns edge-on, and shifts level on landing."""
    away_db = NEARING_DB_PER_S * np.abs(jump_clock() - LOUDEST_S)
    facing_db = turn_db * around(TURN_S, TURN_WIDTH_S) + landed_db * after(LANDED_S, 0.028)
    facing_db = facing_db + STRAIGHTEN_DB * around(STRAIGHTEN_S, STRAIGHTEN_WIDTH_S)
    return amp(near_db - away_db + facing_db) * after(CLEAR_S, CLEAR_WIDTH_S)


def swish():
    """Spinning knobs and spokes whistle in the air; the pitch sags as the bike swings sideways and recovers."""
    hz = SWISH_HZ + SWISH_BEND_HZ * (1 - around(SWISH_S, .26))
    broad = amp(SWISH_BROAD_DB) * whistle(1.25 * hz, 3 * SWISH_BAND_HZ)
    air = unit(patchy(whistle(hz, SWISH_BAND_HZ) + broad, depth_db=2.5))
    air = coloured(air, [(400, -22), (1000, 0.5), (1700, -1.5), (3500, -26)])
    return amp(SWISH_DB) * around(SWISH_S, SWISH_WIDTH_S) * air


def landings(thump_t60=0.039, slap_t60=0.03, rise=0.0015):
    """Each contact slaps the ground with a noise burst and leaves a low, bouncing sine thump."""
    out, t = np.zeros(N), np.arange(SR // 4) / SR
    for s, thump_db, hz, slap_db in LANDINGS:
        thump = -np.sin(2 * np.pi * hz * t) * amp(-60 * t / thump_t60) * (1 - np.exp(-t / rise))
        slap = coloured(rng.standard_normal(len(t)) * amp(-60 * t / slap_t60), SLAP_SPECTRUM)
        add(out, s, amp(thump_db + 8.5) * thump + amp(slap_db) * slap / np.abs(slap).max())
    return out


def skids(rasp_width_hz=560, spray_width_hz=1900, spray_db=-3):
    """Rubber sticks and slips over the dirt in coarse jerks, its rasp gliding in pitch through each slide."""
    rows, t = np.array(SKIDS), np.arange(N) / SR
    s, length, _, first_hz, last_hz, scuff_db = rows[np.searchsorted(rows[1:, 0], t)].T
    hz = first_hz + (last_hz - first_hz) * np.clip((t - s) / length, 0, 1)
    jerks = amp(1.8 * wobble(160))
    dirt = patchy(jerks * grains(rate=2000, spread_db=1, smooth=0.94), depth_db=0.5)
    scuff = coloured(dirt, SCUFF_SPECTRUM)
    rasp = unit(jerks * (whistle(hz, rasp_width_hz) + amp(spray_db) * whistle(hz, spray_width_hz)))
    slides = swells([row[:3] for row in SKIDS], attack=0.0049, release_t60=0.043)
    return slides * (amp(scuff_db) * scuff + amp(-2.5) * rasp)


def hums(waver=0.01):
    """Short gliding sine tones of the passing tyres, each swelling and fading in one arch."""
    out = np.zeros(N)
    for s, length, db, first_hz, last_hz in HUMS:
        progress = np.clip((np.arange(N) / SR - s) / length, 0, 1)
        hz = (first_hz + (last_hz - first_hz) * progress) * (1 + waver * wobble(50))
        tone = unit(np.sin(2 * np.pi * np.cumsum(hz) / SR))
        out += np.sin(np.pi * progress) * amp(db + 0.93 * wobble(30)) * tone
    return out


def scene():
    """The treble follows the bike to the left; the bass bends round the microphone body and stays central."""
    bright = setting_off() + freehub() + swish() + rolling() + skids() + clacks() + squeaks()
    drone = ramp()
    sides = np.array([[1], [-1]])
    pan_db = PAN_AHEAD_DB + PAN_NEAR_DB * after(1.22, 0.084) + PAN_BEHIND_DB * after(PASS_S, PASS_WIDTH_S)
    bass = filtered(bright, lambda hz: 1 / (1 + (hz / 650) ** 4))
    left, right = (bright - bass) * amp(pan_db * sides / 2)
    difference = filtered((left - right) / 2, lambda hz: along(SHADOW, hz))
    placed = bass + (left + right) / 2 + sides * difference
    placed = filtered(placed, lambda hz: np.exp(1j * sides * along(SIDE_PHASE, hz)))
    answer = surroundings(amp(-33.5) * bright + amp(-24) * drone)
    return placed + drone + hums() + landings() + answer + breeze()


def record(dry):
    """Lift the whole slightly, roll off the top treble and keep nothing from TOP_HZ up."""
    rolloff = [(12500, 0.5), (14000, -1), (15400, -8)]
    return filtered(dry, lambda hz: amp(along(rolloff, hz)) * (hz < TOP_HZ))


dry = scene()
out = record(dry)
wav_record(out)
```